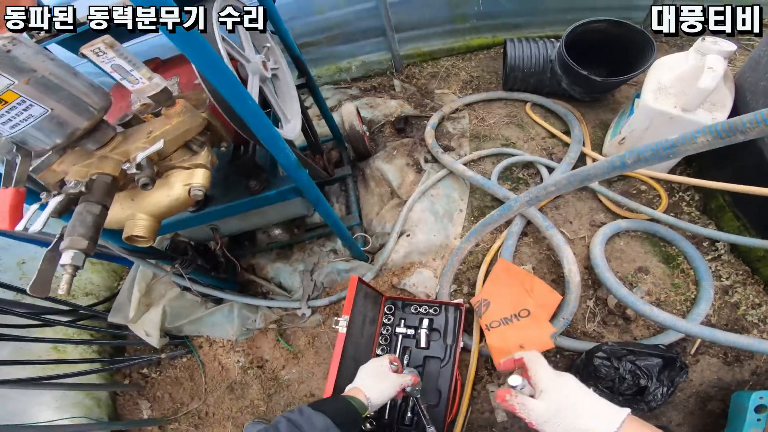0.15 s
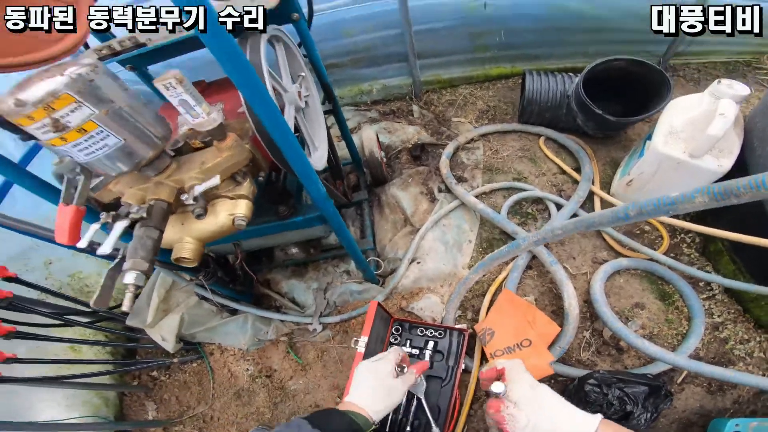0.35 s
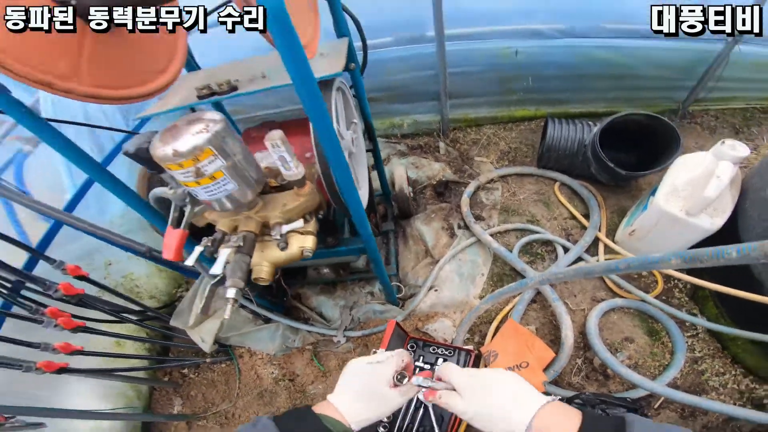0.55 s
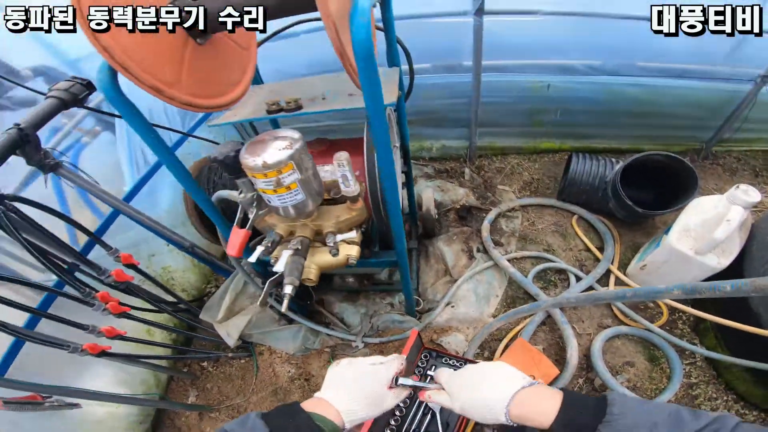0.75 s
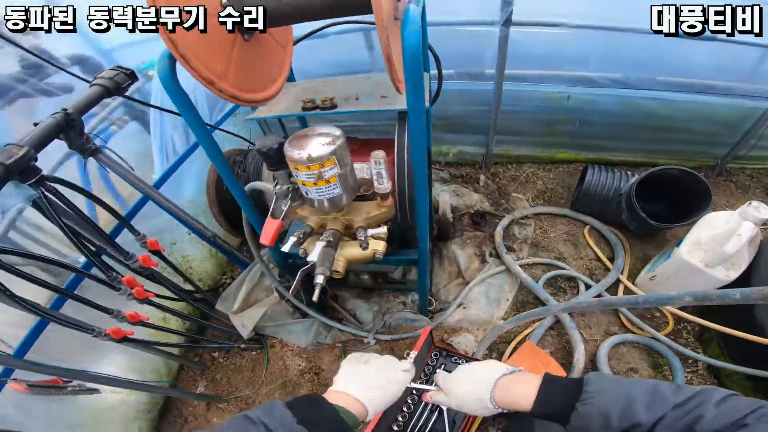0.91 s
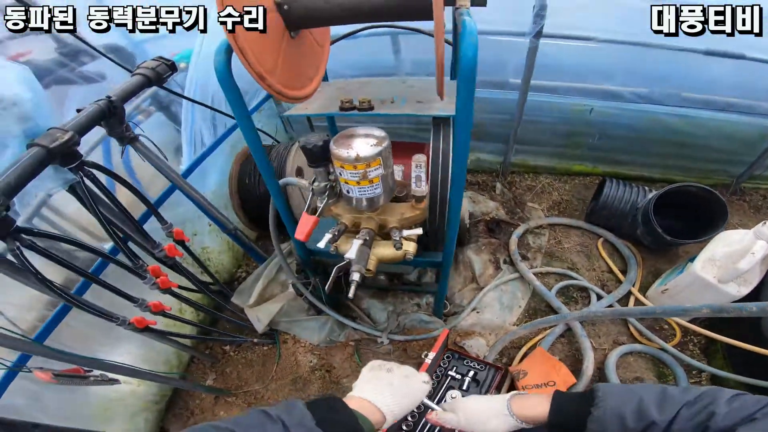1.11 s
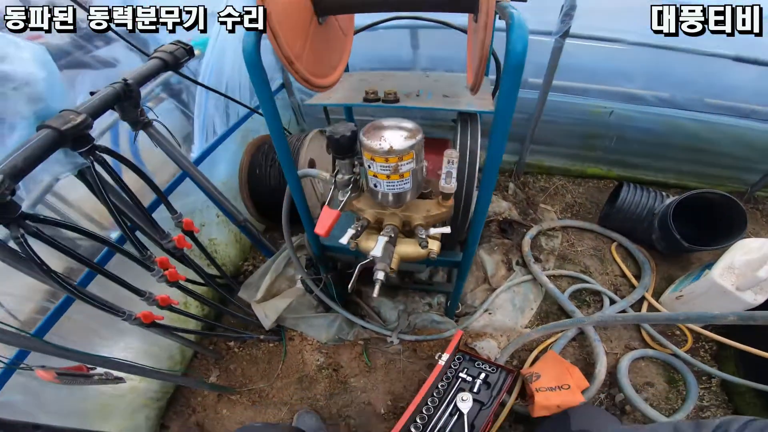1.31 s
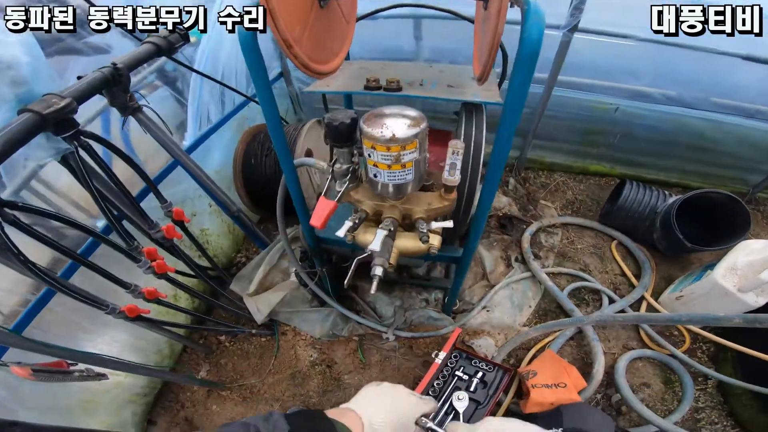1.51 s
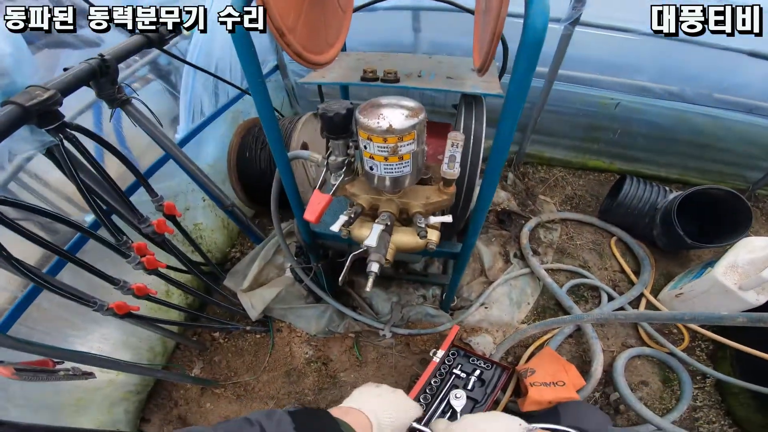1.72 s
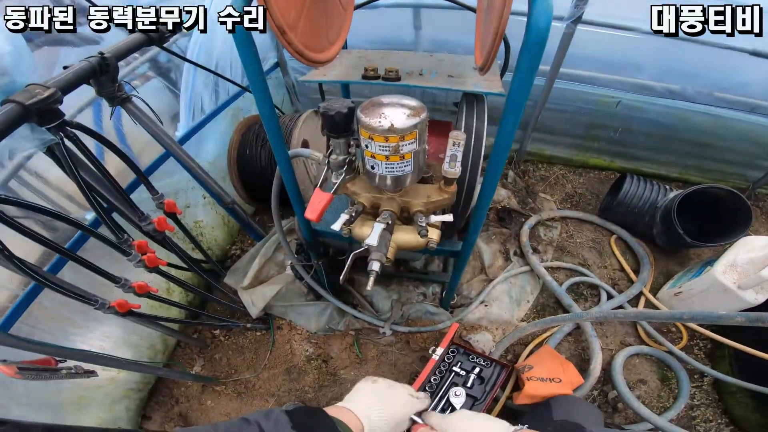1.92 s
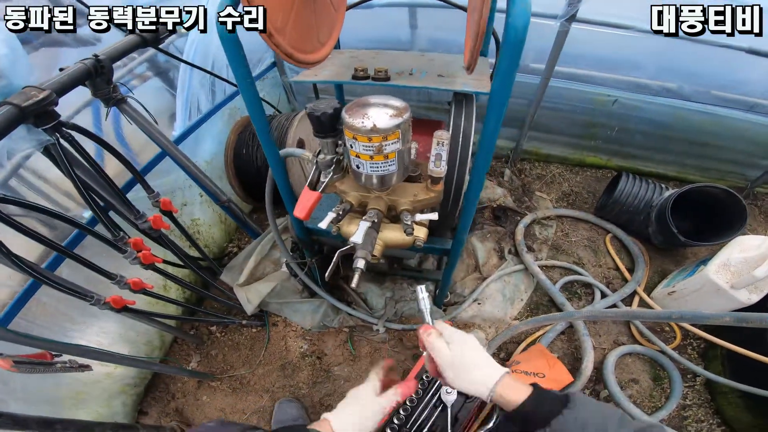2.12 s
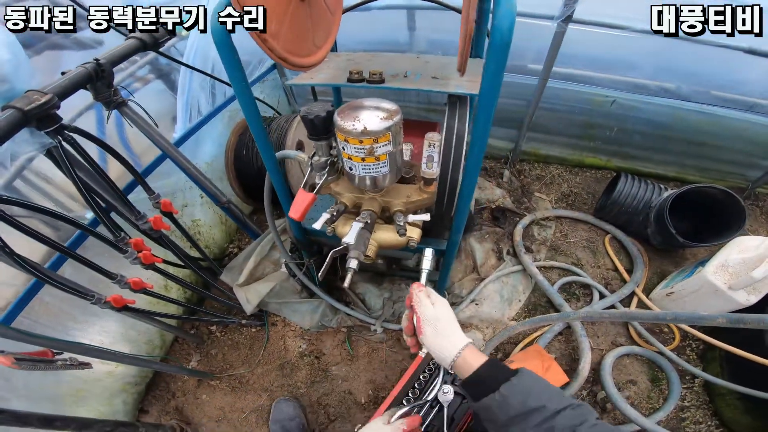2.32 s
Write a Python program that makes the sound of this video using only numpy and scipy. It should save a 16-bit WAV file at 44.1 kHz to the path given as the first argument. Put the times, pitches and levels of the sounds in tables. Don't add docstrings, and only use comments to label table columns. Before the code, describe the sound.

A ratchet wrench drops loudly into a steel case, bouncing and ringing until a hand stops it; then sockets tick, clink and scrape, heard close from a chest-worn stereo microphone in a plastic greenhouse.

```python
import sys
import numpy as np
from scipy import signal
from scipy.fft import rfft, irfft, next_fast_len
from scipy.io import wavfile
from scipy.ndimage import uniform_filter1d, map_coordinates

SR = 44100
rng = np.random.default_rng(int(sys.argv[2]) if len(sys.argv) > 2 else 0)


def linear_from_db(decibels):
    return 10 ** (np.asarray(decibels, float) / 20)


def store_wav(level_fs):
    pcm = np.round(np.clip(np.atleast_2d(level_fs), -1, 1) * 32767)
    wavfile.write(sys.argv[1], SR, pcm.T.astype(np.int16))


N = 103635


def unit(x):
    return x / np.sqrt(np.mean(x ** 2) + 1e-20)


def along(points, hz):
    f, v = np.transpose(points)
    return np.interp(np.log(hz + 1), np.log(f + 1), v)


def curve(rows):
    return np.interp(np.arange(N) / SR, *np.transpose(rows))


def wobble(rate, size=N):
    return map_coordinates(rng.standard_normal(size // 100), [np.arange(size) * rate / SR])


def filtered(x, response):
    n = x.shape[-1]
    m = next_fast_len(n + 8192)
    return irfft(rfft(x, m) * response(np.fft.rfftfreq(m, 1 / SR)), m)[..., :n]


def peak(f, hz, width):
    return 1j * f * width / (hz * hz - f * f + 1j * f * width)


def add(out, s, x):
    part = out[:, round(s * SR):][:, :x.shape[1]]
    part += x[:, :part.shape[1]]


# frequency in Hz, likeness from -1 to 1.
LIKENESS = [(60, 0.92), (350, 0.94), (600, 0.63), (1000, 0.072), (3770, 0.65), (9000, -0.45), (15000, 0.58)]
# frequency in Hz, left minus right in dB.
SIDE_LEAN = [(60, -1), (250, 1), (600, -3), (1650, -5), (4970, -2.5), (15000, 1)]


def spread(pair, level_db):
    def turn(hz):
        return np.arccos(np.clip(along(LIKENESS, hz), -1, 1)) / 2

    mid, side = filtered(pair, lambda hz: linear_from_db(level_db(hz)) * [np.cos(turn(hz)), np.sin(turn(hz))])
    ears = np.array([mid + side, mid - side])
    return filtered(ears, lambda hz: linear_from_db(along(SIDE_LEAN, hz) * np.array([[.5], [-.5]])))


def burst(level_db, t60, crack_db, lumps_db, rise_s):
    t = np.arange(SR // 4) / SR
    noise = unit(spread(rng.standard_normal((2, len(t))), level_db))
    decay = linear_from_db(-60 * t / t60) * linear_from_db(lumps_db * wobble(324, size=len(t)))
    crack = linear_from_db(crack_db - 60 * t / 0.011)
    return noise * (decay + crack) * (1 - np.exp(-t / rise_s))


# start in seconds, peak level in dB, 60 dB decay time in seconds, brightness in dB per octave.
WRENCH_BLOWS = [
    (0.2116, -4, 0.27, -1.5),
    (0.3212, -4.5, 0.18, -1),
    (.338, -18, 0.28, -8),
    (0.383, -10.5, 0.2, -0.5),
    (.406, -11.5, 0.35, -2),
    (.427, -17.5, 0.17, -2),
    (0.446, -20.5, 0.12, 1.5),
    (0.468, -27, 0.19, -0.5),
    (0.515, -37.5, 0.51, 4.5),
]
# frequency in Hz, level in dB per Hz.
CASE_COLOUR = [(35, -67), (60, -12.5), (585, -6), (773, 0), (1450, 0), (1790, -3.5), (9510, -17),
               (11000, -33.5), (15000, -37.5), (16200, -60)]
# frequency in Hz, width in Hz, level in dB.
CASE_LOW_MODES = [(97.6, 9.7, -0.5), (146, 36, -4), (278, 110, -11)]


def case():
    out, push = np.zeros((2, N)), np.zeros(N)
    for s, db, t60, tilt in WRENCH_BLOWS:
        def colour(hz):
            return along(CASE_COLOUR, hz) + tilt * np.log2(hz / 1500 + 0.015)

        rise_s = 0.00051 * linear_from_db(-.9 * (db + 5.5))
        add(out, s, linear_from_db(db - 7) * burst(colour, t60, crack_db=7.0, lumps_db=-0.5, rise_s=rise_s))
        push[round(s * SR)] = linear_from_db(db + 32.5)
    push = uniform_filter1d(uniform_filter1d(push, size=25), size=17)

    def boom(f):
        return sum((-1) ** k * linear_from_db(db) * peak(f, hz, width) for k, (hz, width, db) in enumerate(CASE_LOW_MODES))

    return out + filtered(push, boom)


# start in seconds, level of the bending modes in dB, level of the overtone in dB.
HANDLE_CONTACTS = [(0.322, -34, -48), (0.331, -24, -14), (.337, -14.5, -25), (.347, -42, -24),
                   (.361, -30, -23), (0.372, -27, -14), (0.387, -9, -24), (0.405, -22.5, -45),
                   (.424, -16, -25), (0.434, -36, -21), (0.443, -9, -21), (.449, -52, -30),
                   (0.465, -20.5, -34.5), (.484, -14, -35), (0.511, -12.5, -50), (0.522, -18, -42),
                   (0.532, -23, -38), (.548, -25, -50), (0.571, -23.5, -62), (0.589, -20.5, -51),
                   (0.608, -31.5, -43.5), (0.617, -23, -52), (0.649, -32, -61), (0.678, -33, -83),
                   (.775, -41, -68), (.845, -51, -83)]
# frequency in Hz, level in dB, 60 dB decay time in seconds.
HANDLE_BENDING = [(1246, 0, .45), (1270, -11, .2), (1322, -19, .3)]
# frequency in Hz, level in dB, 60 dB decay time in seconds.
HANDLE_OVERTONES = [(6442, 0, .3)]
# frequency in Hz, level in dB, 60
# dB decay time in seconds.
UPPER_MODES = [(2482, -39, 1.2), (3370, -46, 2.2), (5870, -45, 2.5), (10257, -41, .9), (12500, -55, .2),
               (13750, -53, .9), (14700, -50, .4)]
HAND_CLOSES_S, SWELL_S = 0.63, 0.0026
ROCK_DB, ROCK_RATE = 4.5, 55


def handle():
    t = np.arange(N) / SR
    s, low_db, high_db = np.transpose(HANDLE_CONTACTS)
    latest = np.maximum(np.searchsorted(s, t) - 1, 0)
    age = np.maximum(t - s[latest], 0)
    rise = 1 - .6 * np.exp(-age / SWELL_S)
    held = linear_from_db(-80 * np.maximum(t - HAND_CLOSES_S, 0))
    # strength, seconds of ringing, modes, left minus right in dB, share of the rocking
    groups = [(rise * linear_from_db(low_db[latest]), age, HANDLE_BENDING, -9.5, .25),
              (rise * linear_from_db(high_db[latest]), age, HANDLE_OVERTONES, -1.5, .7),
              (held, t - s[0], UPPER_MODES, -2.5, 1.2)]
    out = np.zeros((2, N))
    for size, life, modes, pan_db, rock in groups:
        for hz, db, t60 in modes:
            ring = (t > s[0]) * size * linear_from_db(db - 60 * life / t60)
            smooth = uniform_filter1d(ring, size=200)
            drift = .07 * rock * wobble(ROCK_RATE)
            smooth = smooth * linear_from_db(ROCK_DB * rock * wobble(ROCK_RATE))
            for ch, side in enumerate((.5, -.5)):
                level = linear_from_db(side * pan_db + 2 * rock * wobble(ROCK_RATE))
                out[ch] += smooth * level * np.sin(2 * np.pi * (hz * t + drift + 0.52 * rng.random()))
    return out


# start in seconds, peak level in dB, strongest frequency in Hz,
# 60 dB decay time in seconds, ring level in dB.
SOCKET_TAPS = [(0.6949, -21, 2990, 0.11, 4), (0.7907, -37.5, 4330, 0.08, -2),
               (0.8272, -24, 2530, 0.04, -14), (0.961, -30.5, 1580, 0.05, -13),
               (1.003, -15, 1535, 0.062, -10), (1.126, -37.5, 3000, 0.029, -6),
               (1.239, -44, 2630, 0.046, 3.5), (1.277, -36, 2160, .04, -14), (1.29, -32, 6020, 0.073, -8),
               (1.31, -18, 2510, 0.091, -20), (1.4218, -34, 2980, .05, -12), (1.436, -32, 5000, 0.035, -12),
               (1.4403, -26.5, 4980, 0.075, -8), (1.4775, -31, 1500, 0.036, -22),
               (1.4966, -14, 7120, 0.07, -11), (1.5686, -27, 3045, 0.031, 1.5),
               (1.6229, -11, 7500, 0.026, -18), (1.696, -6.5, 2500, 0.06, -40),
               (1.7204, -28.5, 1380, 0.13, 2), (1.773, -19.5, 2550, 0.025, -10),
               (1.82, -16, 6100, 0.024, -8), (1.8239, -1, 6970, 0.098, -14),
               (1.8358, -14.5, 6540, 0.048, -6), (2.005, -28.5, 1920, 0.031, -4)]
# frequency in Hz, level in dB per Hz.
TICK_COLOUR = [(180, -44), (300, -7), (809, -7), (1400, 1), (3030, -5.5), (6710, -0.5), (9490, -1.5),
               (11000, -20), (15000, -28), (16000, -54)]
# frequency in Hz, level in dB, 60 dB decay time in seconds.
SOCKET_MODES = [(2616, -6, .04), (2998, 0, .056), (3569, -6, .07), (4344, -5, .09), (5087, -12, .09),
                (6115, -6, .073), (7004, -5, .09), (7930, -16, .1), (9100, -12, .16)]
FOCUS_DB, FOCUS_OCT = 6, 1


def taps():
    out, t = np.zeros((2, N)), np.arange(SR // 4) / SR
    for s, db, hz, t60, ring_db in SOCKET_TAPS:
        def lift(f):
            return FOCUS_DB * np.exp(-(np.log2(f / hz + .001) / FOCUS_OCT) ** 2 / 2)

        t60 = np.clip(t60, .03, .2)
        tick = burst(lambda f: along(TICK_COLOUR, f) + lift(f), t60, crack_db=0.5, lumps_db=-1.0, rise_s=0.0023)
        add(out, s, linear_from_db(db - 11.5) * tick)
        ring = np.zeros((2, len(t)))
        for mode_hz, mode_db, mode_t60 in SOCKET_MODES + [(hz, -3, .07)]:
            loudness, phase, detune = rng.standard_normal((3, 2))
            level_db = mode_db + lift(mode_hz) + 4 * loudness[:, None]
            decay = linear_from_db(level_db - 60 * t / min(mode_t60, t60 * 1.4))
            pitch = mode_hz * (1 + 0.0013 * detune[0])
            ring += decay * np.sin(2 * np.pi * pitch * t + phase[:, None])
        rise = 1 - np.exp(-t / 0.00024)
        add(out, s, linear_from_db(db + ring_db - 15) * ring * rise * linear_from_db([[-1.5], [1.5]]))
    return out


# start in seconds, level in dB, frequency in Hz, 60 dB decay time in seconds.
CLINK_NOTES = [(0.9607, -33, 1626, 0.032), (1.0035, -29, 2870, 0.045), (1.0022, -41, 4320, 0.093),
               (1.0043, -42, 6681, .12), (1.0023, -40.5, 8460, 0.083), (1.238, -60, 7000, 0.09),
               (1.289, -36.5, 6030, .04), (1.296, -31.5, 6120, 0.044), (1.3102, -33, 2524, 0.066),
               (1.313, -40.5, 4010, .06), (1.325, -29.5, 4100, 0.033), (1.337, -31, 4100, 0.077),
               (1.336, -39, 6070, .08), (1.35, -36, 7950, 0.044), (1.4215, -36, 2970, 0.047),
               (1.4403, -33, 4930, 0.039), (1.445, -36, 2880, 0.1), (1.568, -47, 3960, 0.055),
               (1.6232, -33.5, 7290, 0.066), (1.625, -37, 9100, 0.059), (1.6237, -39, 5520, 0.046),
               (1.6215, -38, 2805, 0.066)]


def clinks():
    out, t = np.zeros((2, N)), np.arange(SR // 4) / SR
    for s, db, hz, t60 in CLINK_NOTES:
        decay = linear_from_db(db - 60 * t / t60 + 5.3 * wobble(260, size=len(t)))
        note = np.sin(2 * np.pi * (hz * t + 0.39 * rng.random((2, 1))))
        add(out, s, decay * note * (1 - np.exp(-t / .001)) * linear_from_db([[-1.8], [1.8]]))
    return out


def rattle(t, length, hz, count=90):
    start, octave = rng.random(count), rng.standard_normal(count)
    size, pan = rng.exponential(size=count), rng.random((2, count))
    age = np.maximum(t - start[:, None] * (length + 0.012), 0)
    pitch = np.clip(1.4 * hz * 2 ** (0.9 * octave), 200, 6000 + 4000 * pan[0])[:, None]
    decay = np.exp(-np.pi * (37 + .015 * pitch) * age)
    notes = linear_from_db(1.5 * size)[:, None] * np.sin(2 * np.pi * pitch * age) * decay * (1 - np.exp(-age / 0.0055))
    both = ([[.5], [.8]] + 0.1 * pan) @ notes
    return both / np.sqrt(np.mean(both[:, t < length] ** 2))


# start in seconds, length in seconds, level in dB, squeak in Hz, squeak level in dB.
TRAY_SLIDES = [
    (1.275, 0.032, -41, 501, -4),
    (1.31, 0.013, -38, 2504, 6),
    (1.361, 0.034, -50, 4100, -6),
    (1.404, 0.041, -45, 2770, -2),
    (2.025, 0.032, -28.5, 353.3, 2.5),
    (2.033, 0.026, -35, 519, 11),
    (2.068, .02, -33, 743, 5),
    (2.092, 0.044, -36, 1000, 3),
    (2.132, 0.065, -41.5, 728, 6),
]
# start in seconds, length in seconds, level in dB, squeak in Hz, squeak level in dB.
SWELLING_STROKES = [
    (1.318, 0.035, -33.5, 6130, 3.5),
    (2.19, 0.029, -37.5, 1224, 13),
    (2.212, .038, -35.5, 1397, 12),
    (2.248, 0.028, -35.5, 1996, 7),
]
# frequency in Hz, level in dB per Hz.
GRIT_COLOUR = [(120, -28), (200, -5), (1190, -7.5), (1350, -4), (7220, -15), (10000, -16.5), (11000, -29),
               (15000, -37.5), (16000, -66)]
GRITS_PER_S, SQUEAK_WIDTH_HZ = 2500, 300


def slides():
    out, t = np.zeros((2, N)), np.arange(SR // 3) / SR
    strokes = [(row, .008, .014) for row in TRAY_SLIDES]  # row, rise and fall in seconds
    strokes += [(row, row[1], .013) for row in SWELLING_STROKES]
    for (s, length, db, hz, squeak_db), rise_s, fall_s in strokes:
        grits = (rng.random(len(t)) < GRITS_PER_S / SR) * rng.random(len(t))
        drive = (unit(uniform_filter1d(grits, size=30)) + 3.4) * rng.standard_normal((2, len(t)))
        broad = unit(spread(drive, lambda f: along(GRIT_COLOUR, f)))
        flat = spread(drive, lambda f: 0 * f)
        squeak = unit(filtered(flat, lambda f: peak(f, hz, SQUEAK_WIDTH_HZ) ** 2))
        stroke = np.minimum(t / rise_s, 1) * np.exp(-np.maximum(t - length, 0) / fall_s)
        stroke = stroke * linear_from_db(2.38 * wobble(75.6, size=len(t)))
        mix = broad + linear_from_db(squeak_db - 8.5) * squeak + linear_from_db(-1.5) * rattle(t, length, hz)
        add(out, s, linear_from_db(db - 2) * stroke * mix)
    return out


# start in seconds, level in dB, frequency in Hz, 60 dB decay time in seconds.
SOFT_KNOCKS = [
    (0.2, -27, 780, 0.069),
    (1.0056, -22.5, 1630, 0.021),
    (1.004, -21.5, 1200, 0.014),
    (1.477, -22.5, 278, 0.059),
    (1.854, -37, 43.5, 0.16),
]


def knocks():
    out, t = np.zeros((2, N)), np.arange(SR // 3) / SR
    for s, db, hz, t60 in SOFT_KNOCKS:
        note = linear_from_db(db - 60 * t / t60) * np.sin(2 * np.pi * hz * t)
        add(out, s, note * (1 - np.exp(-t / 0.0017)) * linear_from_db([[-.5], [.5]]))
    return out


# frequency in Hz, 60 dB decay time in seconds.
ROOM_DECAY = [(500, 0.045), (10000, 0.22)]


def greenhouse(x):
    hz, t, z = signal.stft(rng.standard_normal((2, SR // 2)), SR, nperseg=256)
    tail = signal.istft(z * linear_from_db(-60 * t / along(ROOM_DECAY, hz)[:, None]), SR, nperseg=256)[1]
    late = np.pad(x, ((0, 0), (250, 0)))
    return signal.fftconvolve(late, tail / np.linalg.norm(tail[0]), axes=1)[:, :N]


# frequency in Hz, level in dB per Hz.
AIR_COLOUR = [(120, -28), (200, -1.5), (1260, 1.5), (2060, -5.5), (2420, -1), (2650, -2.5), (3010, -5.5),
              (9310, -15), (15500, -51)]
# time in seconds, level in dB.
RUSTLE_LEVEL = [(0.0, -53.5), (.19, -55.5), (0.6, -53.5), (.9, -60), (1.0, -58), (1.18, -58.5),
                (1.3, -52.5), (1.6, -53.5), (1.95, -56.5), (2.02, -50.5), (2.35, -52)]


def air():
    hiss = unit(spread(rng.standard_normal((2, N)), lambda f: along(AIR_COLOUR, f)))
    return hiss * linear_from_db(curve(RUSTLE_LEVEL) + 5.0 + 0.55 * wobble(23.7))


# frequency in Hz, level in dB per Hz.
RUMBLE_COLOUR = [(12, -40), (20, -7), (74, 1), (123, -2), (274, -5.5), (398, -12), (700, -17.5), (910, -23),
                 (1540, -120)]
# time in seconds, level in dB.
BODY_LEVEL = [(0, -58), (.08, -50), (.18, -59), (.6, -59.5), (.95, -59.5), (1.02, -55.5), (1.1, -50),
              (1.2, -53.5), (1.3, -48), (1.4, -50.5), (1.55, -48), (1.7, -50), (1.8, -50), (1.95, -59),
              (2.04, -48), (2.16, -55.5), (2.35, -53.5)]


def body():
    rumble = unit(spread(rng.standard_normal((2, N)), lambda f: along(RUMBLE_COLOUR, f)))
    return rumble * linear_from_db(curve(BODY_LEVEL) + 1.5 + 1.8 * wobble(18))


def scene():
    steel = case() + handle() + taps() + clinks() + slides() + knocks()
    echo = filtered(greenhouse(steel), lambda f: peak(f, 5300, 15000))
    return steel + linear_from_db(-11) * echo + air() + body()


TREBLE_HZ, MASKED_DB, SCATTER_DB = 10400, -30, 1


def thinned(x):
    hz, _, z = signal.stft(x, SR, nperseg=1024)
    power = np.mean(np.abs(z) ** 2, axis=0)
    bands = power[:512].reshape(32, 16, -1).mean(axis=1)
    limit_db = MASKED_DB + SCATTER_DB * rng.standard_normal(bands.shape)
    kept = bands > power.mean(axis=0) * linear_from_db(2 * limit_db)
    keep = kept[np.arange(513) // 16 % 32] | (hz < TREBLE_HZ)[:, None]
    return signal.istft(z * keep, SR, nperseg=1024)[1][:, :N]


def low_pass(x):
    return signal.sosfilt(signal.butter(12, 15740, fs=SR, output="sos"), x)


def record(dry):
    clipped = dry / (1 + np.abs(dry) ** 6) ** (1 / 6)
    return low_pass(thinned(clipped))


dry = scene()
out = record(dry)
store_wav(out)
```